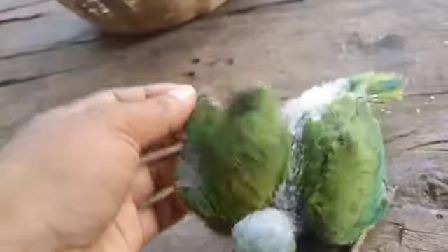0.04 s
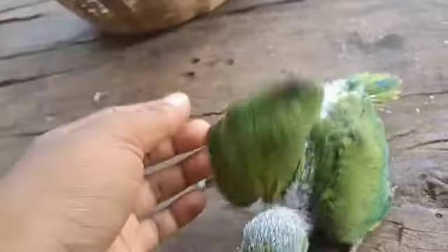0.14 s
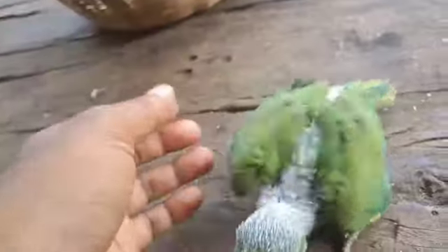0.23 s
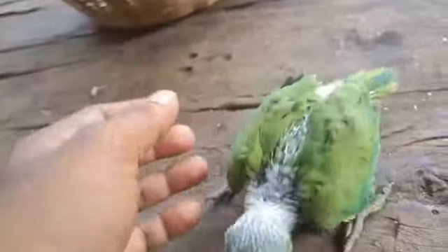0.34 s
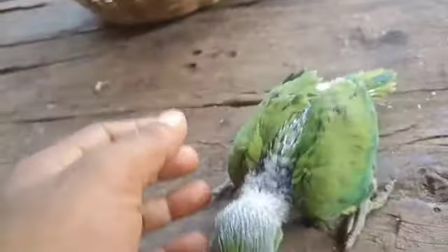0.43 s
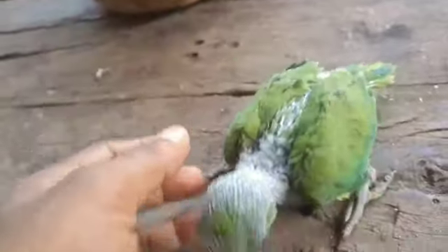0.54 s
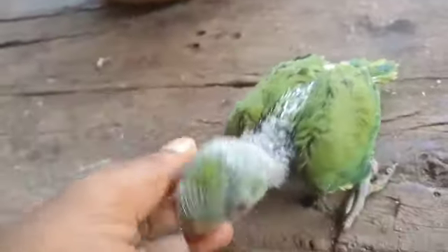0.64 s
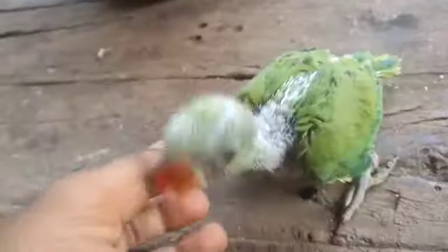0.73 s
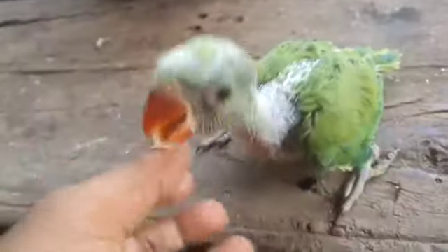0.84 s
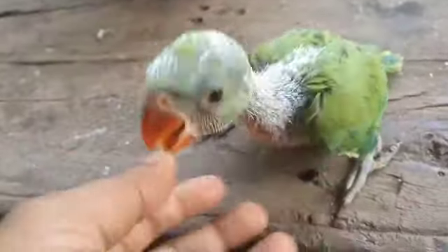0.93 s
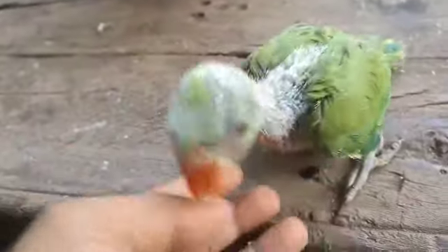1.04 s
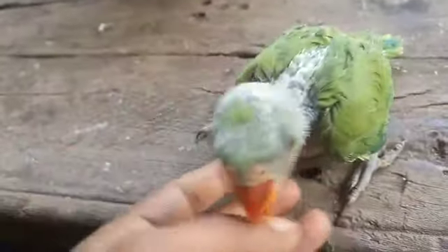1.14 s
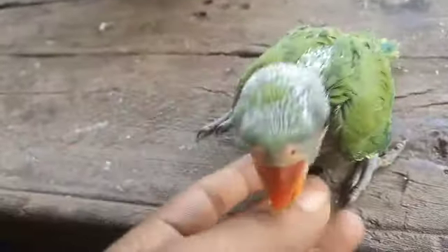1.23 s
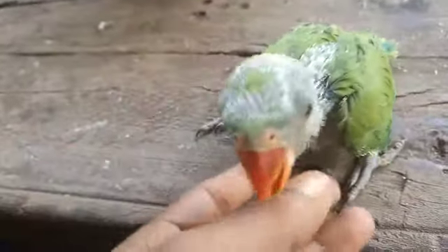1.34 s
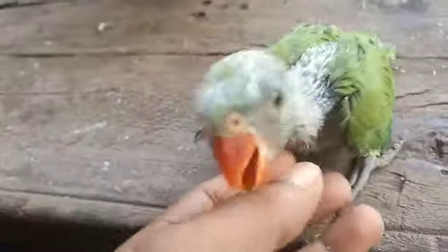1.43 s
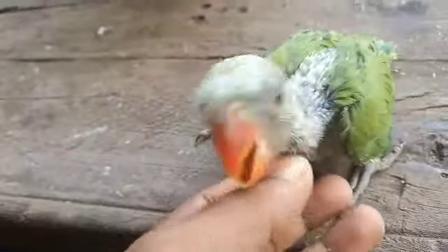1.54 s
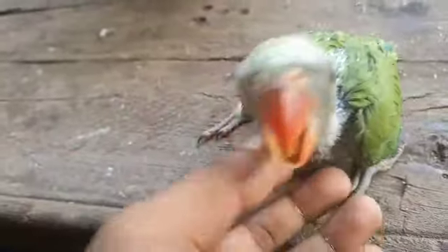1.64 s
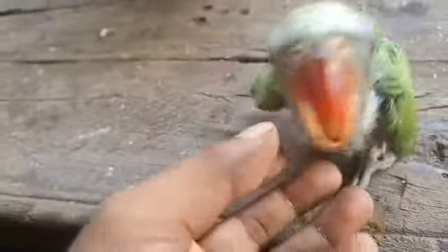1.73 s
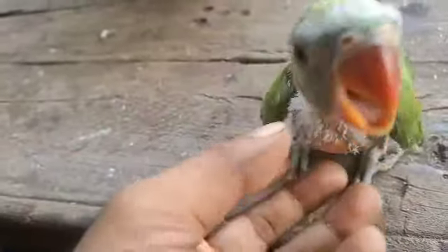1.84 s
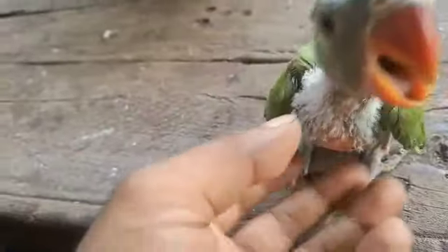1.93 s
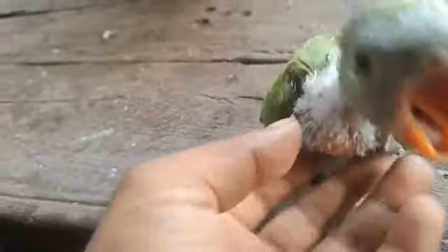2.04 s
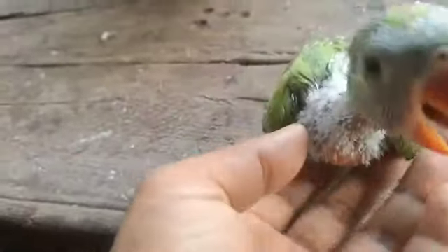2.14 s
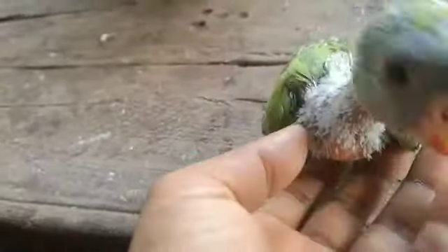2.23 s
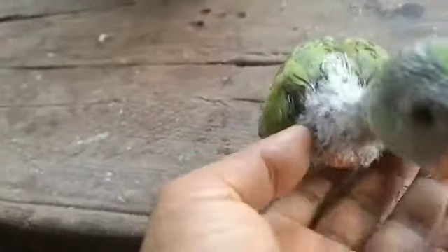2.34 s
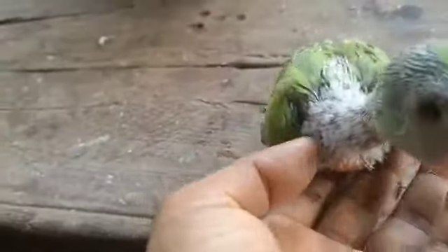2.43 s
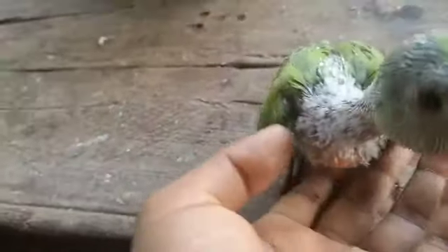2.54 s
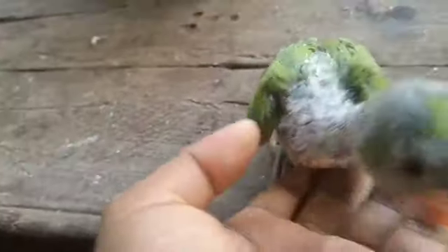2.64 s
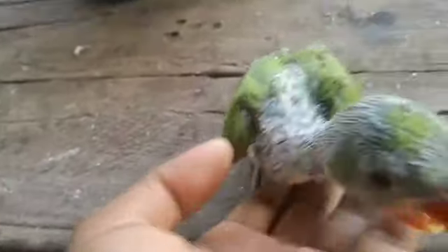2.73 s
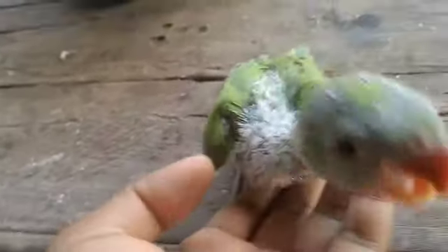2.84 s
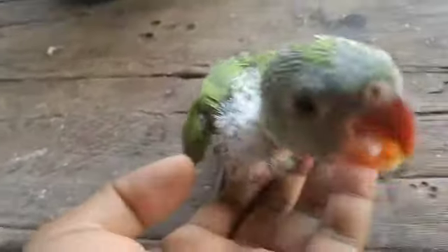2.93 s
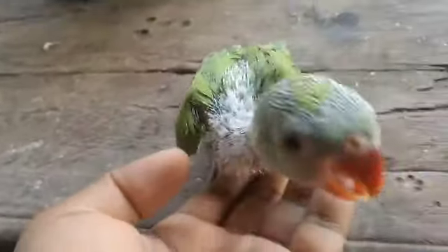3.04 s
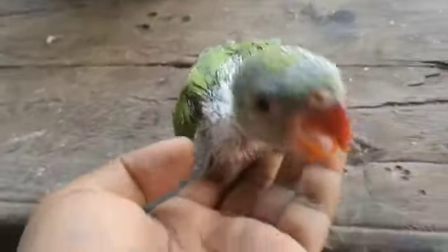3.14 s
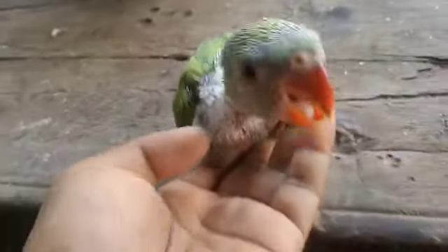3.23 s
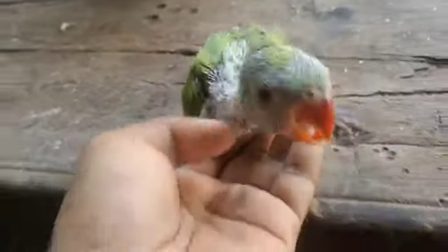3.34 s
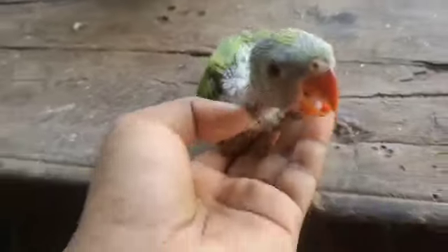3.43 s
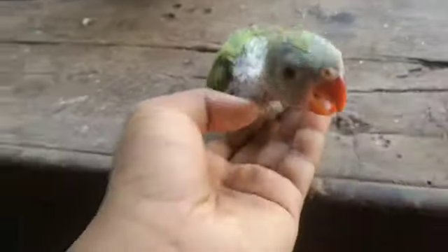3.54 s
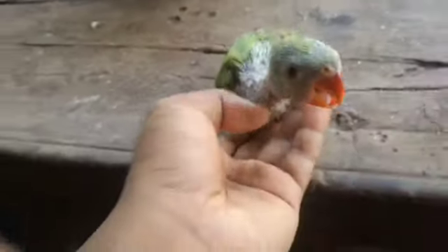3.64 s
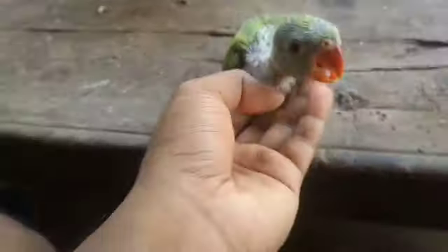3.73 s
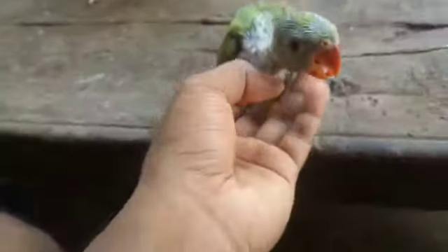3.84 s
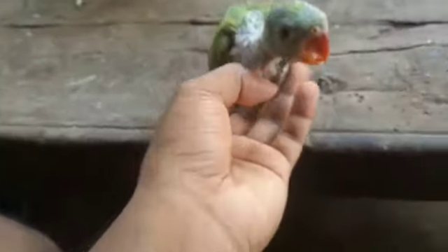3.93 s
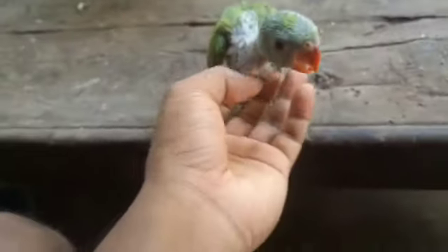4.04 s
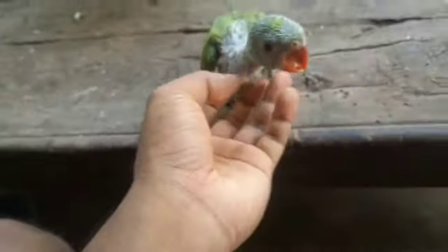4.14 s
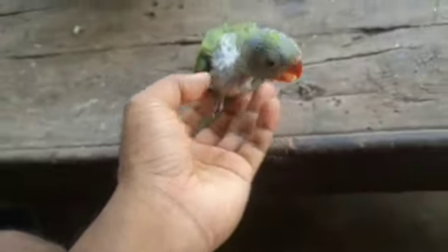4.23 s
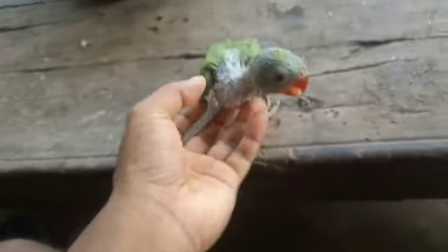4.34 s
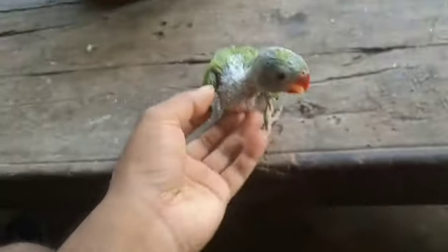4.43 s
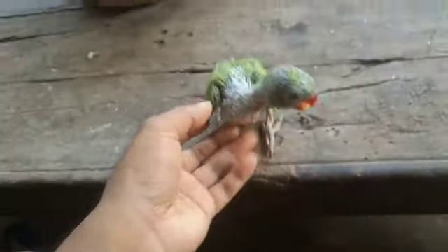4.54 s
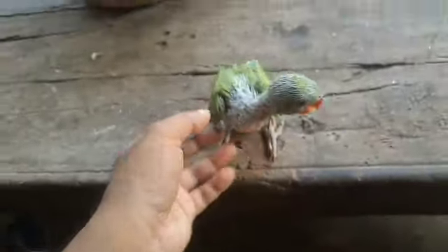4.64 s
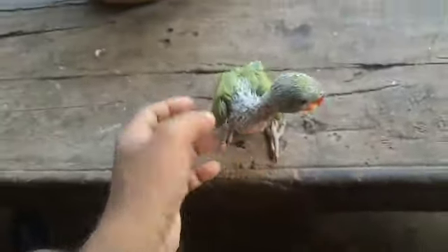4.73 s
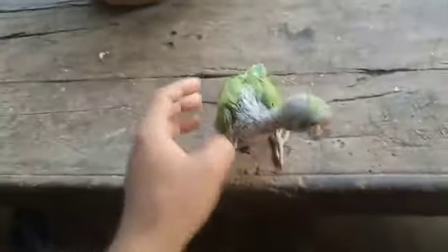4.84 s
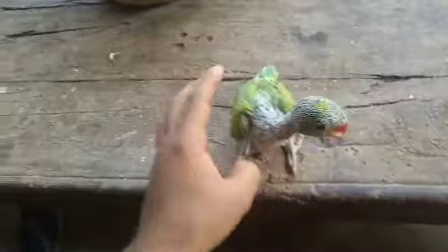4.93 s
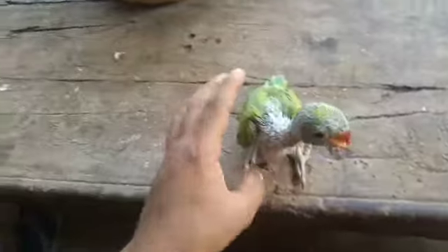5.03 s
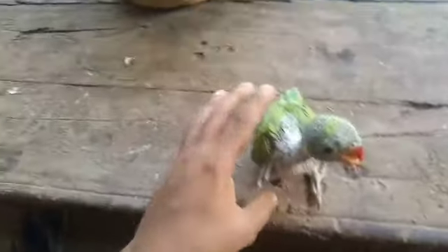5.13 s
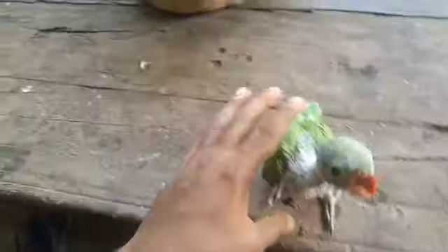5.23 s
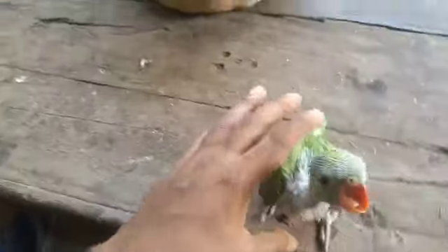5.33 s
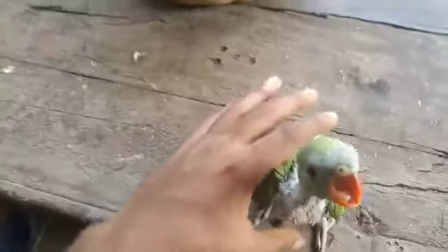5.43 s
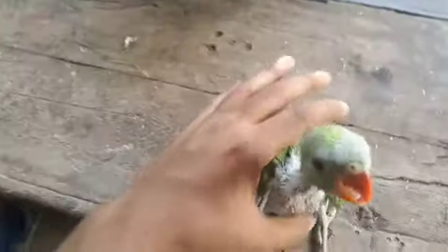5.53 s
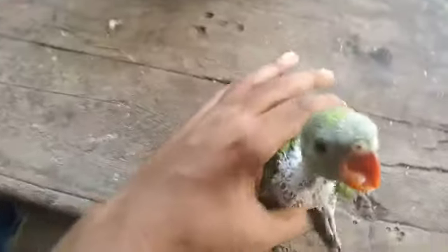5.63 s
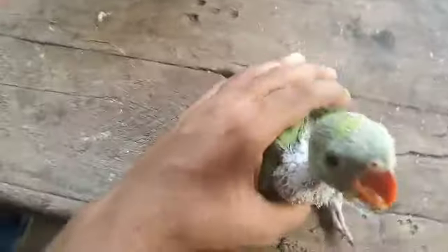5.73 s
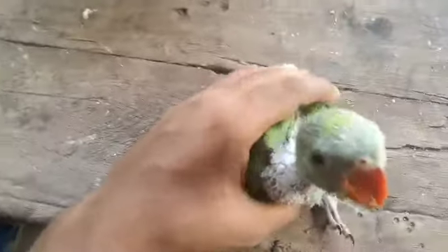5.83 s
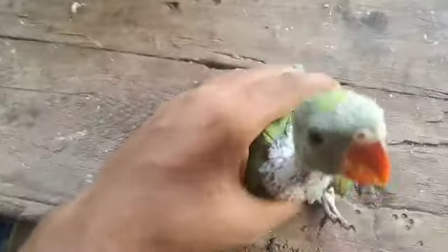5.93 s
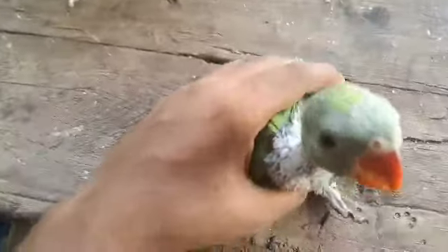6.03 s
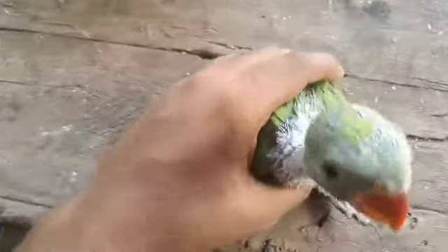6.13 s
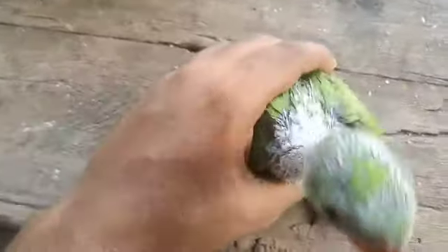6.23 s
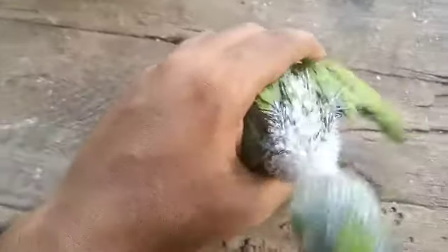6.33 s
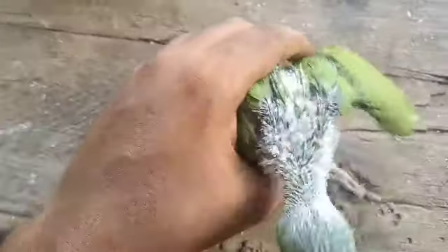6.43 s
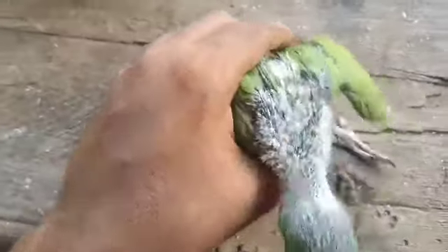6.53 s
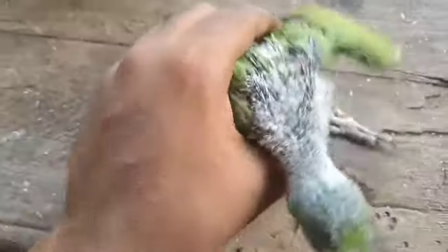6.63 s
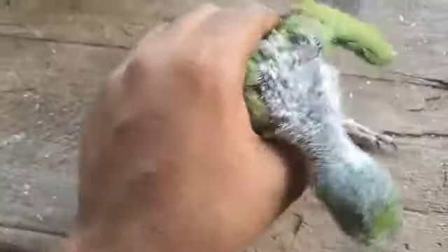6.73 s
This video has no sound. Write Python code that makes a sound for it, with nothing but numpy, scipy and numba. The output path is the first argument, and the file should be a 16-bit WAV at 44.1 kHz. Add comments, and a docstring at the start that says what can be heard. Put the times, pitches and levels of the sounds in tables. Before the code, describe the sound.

After a brief hush with two soft feathery brushes, a young parrot begins begging in a rapid, even string of short, harsh, nasal squawks, about eight per second. They quickly grow loud, weaken midway as the bird turns away, then grow again before stopping. A bright brush, a few tiny claw ticks on wood and a scrapy rustle follow. Close stereo microphone, small open room, low hum and faint insects.

```python
"""On a wooden table in an open room a parrot chick begs in a fast run of short squawks, near a two-port microphone.
Each squawk is a pulse train plus a sine at its pitch, which arches up and down; pulses are ragged at both ends
and ring in resonances of throat and beak. Head pose steers level, colour and lag per port as the head draws away.
Feathers and claws, made of gated noise, sound before and after, over resonant hum, insects and banded room hush."""
import sys
import numpy as np
from scipy import signal
from scipy.io import wavfile
from scipy.ndimage import uniform_filter1d, map_coordinates
from numba import njit

SR = 44100
rng = np.random.default_rng(int(sys.argv[2]) if len(sys.argv) > 2 else 0)


def to_wav(sig):
    """Store sig (one row per channel, or 1-D mono) as 16-bit WAV at the path in sys.argv[1].

    Samples outside -1..1 are clipped; the rate is SR.
    """
    pcm = np.clip(np.atleast_2d(sig), -1, 1) * 32767
    pcm = np.round(pcm).astype(np.int16)
    wavfile.write(sys.argv[1], SR, pcm.T)  # frames by channels


def volts_from_db(level):
    """Convert decibel levels to linear amplitude ratios."""
    exponent = np.asarray(level, float) / 20
    return 10 ** exponent


N = 298557
TIME_S = np.arange(N) / SR

# squawks: (nominal start [s], nominal length [s], top pitch [Hz], place of the top [0-1], relative level [dB])
SQUAWKS = [(0.6642, 0.076, 1304, 0.49, -39.5), (0.8, 0.06, 1245, 0.47, -32),
           (0.9222, 0.059, 1208, 0.45, -29), (1.046, 0.058, 1195, 0.44, -29),
           (1.1699, 0.059, 1235, 0.45, -29), (1.2968, 0.055, 1233, 0.43, -28.5),
           (1.4138, 0.057, 1240, 0.44, -29), (1.5364, 0.061, 1245, 0.38, -29),
           (1.661, 0.061, 1238, 0.36, -29), (1.7891, 0.059, 1215, 0.37, -28.5),
           (1.9131, 0.058, 1191, 0.39, -28), (2.043, 0.056, 1188, 0.4, -28.5),
           (2.1717, 0.055, 1178, 0.42, -28.5), (2.2959, 0.057, 1179, 0.36, -29.5),
           (2.428, 0.057, 1219, 0.4, -30), (2.555, 0.06, 1213, 0.41, -30.5),
           (2.6867, 0.057, 1209, 0.38, -31), (2.8099, 0.063, 1265, 0.39, -32),
           (2.938, 0.057, 1255, 0.39, -30), (3.063, 0.061, 1207, 0.39, -29.5),
           (3.1965, 0.062, 1225, 0.34, -30), (3.3245, 0.059, 1253, 0.37, -30.5),
           (3.451, 0.061, 1230, 0.36, -33), (3.5787, 0.06, 1260, 0.4, -33), (3.709, 0.06, 1241, 0.4, -34),
           (3.8402, 0.052, 1265, 0.42, -35.5), (3.962, 0.0578, 1256, 0.41, -37.5),
           (4.085, 0.051, 1255, 0.49, -36.5), (4.2096, 0.055, 1280, 0.49, -38),
           (4.3393, 0.062, 1283, 0.44, -40.5), (4.4749, 0.063, 1296, 0.32, -42.5),
           (4.612, 0.065, 1298, 0.35, -42), (4.7468, 0.064, 1314, 0.35, -43),
           (4.8766, 0.068, 1247, 0.44, -46), (5.025, 0.065, 1295, 0.29, -44.5),
           (5.1603, 0.063, 1249, 0.34, -42), (5.2973, 0.064, 1208, 0.39, -39),
           (5.453, 0.06, 1208, 0.38, -38), (5.5869, 0.065, 1183, 0.32, -36),
           (5.7464, 0.065, 1135, 0.4, -34.5)]
# voice roughness before end weighting: (time [s], roughness [0-1])
ROUGHNESS = [(.7, .015), (.85, .045), (1.8, .04), (3.1, .04), (4.0, .055), (4.7, .07), (5.1, .07),
             (5.7, .04)]
# main beak resonance before wobble: (time [s], centre [Hz])
BEAK_CENTRE = [(.7, 4000), (1.0, 3700), (1.4, 4020), (2.1, 3220), (2.6, 3590), (3.4, 3410), (4.2, 3800),
               (5.0, 3920), (5.3, 3570), (5.8, 3130)]
# fixed tract resonances, each run twice: (centre [Hz], width per pass [Hz], relative level [dB])
CHEST = [(900, 900, -14.0)]
THROAT = [(1566, 1430, -9), (2170, 1160, -2.5)]
UPPER_BEAK = [(4654, 460, 0.62), (5546, 720, -1.85)]
TREBLE = [(7380, 2030, -7), (9600, 2050, -9)]
SHEEN = [(10900, 430, -21), (11700, 3400, -20.5)]
# head pose: (time [s], right port lag [ms], beak swung to the left port [-1..1], facing away [0-1],
# room share [dB])
HEAD = [(.67, 0.2, -.3, 0.09, -2), (.9, 0.31, 0.42, 0.23, -4), (1.3, 0.25, .2, 0.05, -3.5),
        (1.6, 0.28, 0.66, 0.19, -5.5), (1.85, .27, 0.15, 0.08, -4.5), (2.2, .18, 0.33, 0.26, -4.5),
        (2.62, 0.085, 0.012, 0.13, -2.5), (2.87, 0.07, -0.088, 0.15, -4), (3.13, 0.24, -0.11, 0.15, -3.5),
        (3.6, 0.22, -0.4, 0.13, -3), (3.9, 0.21, 0.093, 0.87, 1), (4.15, 0.21, -0.06, 0.6, 0.5),
        (4.6, 0.18, -0.48, 0.66, 3), (4.95, .1, 0.95, 0.6, 5), (5.23, 0.038, -0.11, 0.79, 1.5),
        (5.52, 0.074, 0.11, 0, 1.5), (5.75, 0.13, 0.67, 0.43, -2.5)]
# port pickup of throat, beak, upper beak, treble, sheen: (left [dB], right [dB], left facing away [dB],
# right facing away [dB], swing slope [dB per full swing], room slope [dB/dB], lag slope [dB/ms])
PORT_PICKUP = [(5.5, 4, 8.5, 5, -5, 0.3248, 8.5), (3, 1, -3.5, 0.5, 8, 0.5, 4),
               (9, 10.5, -1, 0.5, 5, 0.6, -11), (9, 1, -23, 5.5, 3.5, 0.18, 1), (2, -22, -2, 12, 3, 1, 19)]
# echoes off table and hand: (delay [s], level [dB])
TABLE_ECHOES = [(.0012, -33.5), (.0027, -16), (.0046, -26), (.0083, -20.5), (0.0128, -17.5)]
# feathers and skin brushing past: (start [s], rise [s], peak level [dB], fade [dB/s])
BRUSHES = [(.148, 0.014, -61, 38), (.215, 0.013, -56.5, 97), (5.898, 0.15, -77, 22), (6.2, 0.016, -64, 300),
           (6.5, 0.096, -57, 61)]
# brush spectrum: (frequency [Hz], relative density [dB per Hz])
BRUSH_SPECTRUM = [(650, -47), (1100, -9), (1320, -33), (1400, -12), (1740, -3), (3140, -3), (6260, -10),
                  (6900, -11), (9270, -8), (15000, -18.5)]
# scrape resonance, run twice: (centre [Hz], width per pass [Hz], relative gain [dB])
SCRAPE = [(1780, 450, 9.5)]
# claws on wood: (time [s], peak level [dB])
CLAW_TICKS = [(6.183, -56), (6.2315, -64), (6.2935, -54)]
# room hush spectrum: (frequency [Hz], relative density [dB per Hz])
HUSH_SPECTRUM = [(15, -51), (33, -16.5), (45, -8.5), (103, -11.5), (125, -7.5), (202, -8), (286, -10.5),
                 (335, -9), (415, -16.5), (604, -16.5), (10000, -32), (15000, -48)]
# room hush: (time [s], level [dB])
HUSH_LEVEL = [(0, -61.5), (.62, -62.5), (1.0, -59), (6.1, -58.5), (6.32, -63.5), (6.77, -60.5)]
# noise correlation between ports: (frequency [Hz], likeness [-1..1])
PORT_LIKENESS = [(60, 0.67), (180, 0.95), (550, 0.74), (1650, -0.29), (4970, 0.08), (15000, 0.045)]
# noise balance between ports: (frequency [Hz], left over right [dB])
PORT_BALANCE = [(60, 2), (240, 2.5), (950, 1.5), (3770, -6.5), (15000, -2.0)]
# hum and far insects, run twice: (centre [Hz], width per pass [Hz], mean level [dB])
DRONES = [(97.9, 11.4, -67.5), (198.2, 10.7, -73.5), (5800, 810, -76.5)]


def rms_one(x):
    """Scale to rms 1."""
    return x / np.sqrt(np.mean(x ** 2) + 1e-20)


def along(rows, at):
    """Interpolate the columns of a table over its first column."""
    key, *columns = np.transpose(rows)
    return np.array([np.interp(at, key, c) for c in columns])


def at_hz(points, hz):
    """Read a spectrum on a log-frequency axis."""
    points_hz, values = np.array(points).T
    return np.interp(np.log(hz), np.log(points_hz), values)


def drift(knots_per_s):
    """Random wander: straight lines between unit-normal knots."""
    knots = rng.standard_normal(int(N / SR * 40) + 2)
    return np.interp(TIME_S * knots_per_s, np.arange(len(knots)), knots)


def resonate(x, hz, width_hz):
    """Two-pole resonance with gain 1 on top."""
    r = np.exp(-np.pi * width_hz / SR)
    b = np.array([1, 0, -1]) * (1 - r * r) / 2
    return signal.lfilter(b, [1, -2 * r * np.cos(2 * np.pi * hz / SR), r * r], x)


def ring(x, modes):
    """Parallel resonances, each applied twice for dark valleys."""
    return sum(volts_from_db(db) * resonate(resonate(x, hz, width_hz), hz, width_hz) for hz, width_hz, db in modes)


@njit
def glide(x, feedback, r):
    """Two-pole resonance with a moving centre."""
    y = np.zeros(len(x))
    for i in range(2, len(x)):
        y[i] = (1 - r * r) / 2 * (x[i] - x[i - 2]) + feedback[i] * y[i - 1] - r * r * y[i - 2]
    return y


def gliding_resonance(x, centre_hz, width_hz, passes):
    """Run the moving resonance once or more."""
    r = np.exp(-np.pi * width_hz / SR)
    feedback = 2 * r * np.cos(2 * np.pi * centre_hz / SR)
    for _ in range(passes):
        x = glide(x, feedback, r)
    return x


def banded_noise(spectrum, patchy_db):
    """Third-octave stereo noise, each band with its level, flicker, likeness and balance; mono rms 1."""
    out = 0
    edges_hz = 25 * 2 ** np.arange(0, 9.4, 1 / 3)
    white = rng.standard_normal((2, 2, N))
    for k, (low_hz, high_hz) in enumerate(zip(edges_hz, edges_hz[1:])):
        band = signal.butter(2, [low_hz, high_hz], "band", fs=SR, output="sos")
        mid, side = signal.sosfilt(band, white[k % 2])  # neighbours use separate noise
        hz = np.sqrt(low_hz * high_hz)
        alike = np.clip(at_hz(PORT_LIKENESS, hz), -1, 1)
        lean_db = at_hz(PORT_BALANCE, hz) / 2
        gain = volts_from_db(at_hz(spectrum, hz) + patchy_db * drift(10.0)) * volts_from_db(np.array([[lean_db], [-lean_db]]))
        out = out + gain * (np.sqrt(1 + alike) * mid + np.sqrt(1 - alike) * side * [[1], [-1]])
    return out / np.sqrt(np.mean(out.mean(0) ** 2))


def pitch_arch(place, top, top_hz, fall_bend):
    """Membrane pitch [Hz]: rises to a top, then sags to the same slack pitch in every squawk."""
    start_hz, end_hz, rise_bend = 600.2, 577.6, 1.3
    rise = np.sin(np.pi / 2 * np.clip(place / top, 0, 1)) ** rise_bend
    fall = np.cos(np.pi / 2 * np.clip((place - top) / (1 - top), 0, 1)).clip(0) ** fall_bend
    return np.where(place < top, start_hz + (top_hz - start_hz) * rise, end_hz + (top_hz - end_hz) * fall)


def syrinx():
    """A sine at the pitch, and one sharp puff per cycle, shaken in time and size, with air riding on it."""
    lead_s = .0012  # each squawk begins this long before its table time
    release_s = 0.0022
    crest_width = 0.11  # share of the squawk
    ragged_mid, ragged_ends, ragged_reach = .7, 6, .12  # roughness factors; reach as share of the squawk
    air_db, puffs_db = -2, 21
    fundamental, octaves, puffs = np.zeros(N), np.zeros(N), np.full(N, 1e-18)
    taps = np.arange(-8, 9)
    chance = rng.standard_normal((len(SQUAWKS), 2, 128)).clip(-2, 2)
    air = rng.standard_normal(N)
    for (start_s, length_s, top_hz, top, level_db), (shake, size) in zip(SQUAWKS, chance):
        hoarse = along(ROUGHNESS, start_s)[0]
        # a smooth voice starts slowly and holds its pitch
        attack_s, fall_bend = (.02, .7) if hoarse < .035 else (0.0027, 1.45)
        start_s, length_s = start_s - lead_s, length_s + lead_s
        place = np.linspace(0, 1, int(length_s * SR))
        first = round(start_s * SR)
        span = slice(first, first + len(place))
        pitch_hz = pitch_arch(place, top, top_hz, fall_bend)
        cycles = np.cumsum(pitch_hz) / SR
        octaves[span] = np.log2(pitch_hz / 900)

        attack = np.clip(place * length_s / attack_s, 0, 1)
        release = np.clip((1 - place) * length_s / release_s, 0, 1)
        breath = volts_from_db(level_db) * attack * release
        crest = np.exp(-((place - top) / crest_width) ** 2)
        tilt_db = (11 - 287 * hoarse) * octaves[span]  # roughness takes the fundamental's rise with pitch
        fundamental[span] = breath * volts_from_db(-3 + 10 * crest + tilt_db) * np.sin(2 * np.pi * cycles)

        count = int(cycles[-1]) + 1
        where = np.interp(np.arange(count) + .5, cycles, place)
        ends = np.exp(-where / ragged_reach) + np.exp((where - 1) / ragged_reach)
        rough = np.clip(hoarse * (ragged_mid + ragged_ends * ends), 0, .24)
        flutter_db = 30 * rough * uniform_filter1d(size, 3)[:count]
        fundamental[span] *= volts_from_db(np.interp(place, where, flutter_db))

        period = SR / np.interp(where, place, pitch_hz)  # samples
        at = (start_s + where * length_s) * SR + .3 * rough * period * shake[:count]
        # a slack membrane at the ends closes strong-weak
        uneven_db = rough * (10 * size[:count] + 14 * (-1.) ** np.arange(count))
        height = np.interp(where, place, breath) * volts_from_db(2.5 + 5 * where + uneven_db)
        spot = np.round(at)[:, None] + taps
        puff = np.sinc(spot - at[:, None]) * np.hanning(len(taps) + 2)[1:-1]  # placed between samples
        np.add.at(puffs, spot.astype(int), height[:, None] * puff)
        gate = np.exp(-5 * ((cycles + .5) % 1)) * np.interp(place, where, height * rough)
        puffs[span] += volts_from_db(air_db) * gate * air[span]
    return fundamental, octaves, volts_from_db(puffs_db) * puffs


def chick():
    """Puffs ring in the tract; the head's pose sets how each part reaches each port."""
    gape_wobble, beak_width_hz = .03, 850  # share of centre; per pass
    notch_place, notch_width_hz, notch_share = 0.76, 390, 0.45
    beak_db, beak_tilt_db_per_octave, bright_db_per_octave = 5, 3.5, 8.2
    bob_db = 1.5  # small head jerks recolour each part
    fundamental, octaves, puffs = syrinx()
    beak_hz = along(BEAK_CENTRE, TIME_S)[0] * (1 + gape_wobble * drift(8))
    # a side pocket of the tract swallows a band below the beak resonance
    puffs = puffs - notch_share * gliding_resonance(puffs, notch_place * beak_hz, notch_width_hz, 1)
    tilted = puffs * volts_from_db(beak_tilt_db_per_octave * octaves)
    beak = volts_from_db(beak_db) * gliding_resonance(tilted, beak_hz, beak_width_hz, 2)
    bright = puffs * volts_from_db(bright_db_per_octave * octaves)  # tighter membrane, brighter puffs
    parts = [ring(puffs, THROAT), beak, ring(puffs, UPPER_BEAK), ring(bright, TREBLE), ring(bright, SHEEN)]
    highpass = signal.butter(4, 520.0, "high", fs=SR, output="sos")
    low_voice = signal.sosfilt(highpass, fundamental + ring(puffs, CHEST))

    lag_ms, swung, away, room_db = along(HEAD, TIME_S)
    heard = np.array([low_voice, low_voice])
    for part, pickup in zip(parts, PORT_PICKUP):
        left_db, right_db, left_away_db, right_away_db, swung_db, far_db, lag_db = pickup
        pose_db = [left_db + (left_away_db - left_db) * away + swung_db * swung + bob_db * drift(8),
                   right_db + (right_away_db - right_db) * away - swung_db * swung + bob_db * drift(13)]
        heard += volts_from_db(np.array(pose_db) + far_db * room_db + lag_db * lag_ms) * part
    # the lagging port is softer, less so as the room share grows
    right = heard[1] * volts_from_db(.35 * room_db - 18 * lag_ms)
    return np.array([heard[0], map_coordinates(right, [np.arange(N) - lag_ms * SR / 1000], order=3)])


def room(x):
    """Six slightly dulling feedback delays a side, diffused by allpasses, plus close echoes off table and hand."""
    t60_s, reverb_db, wall_cut_hz = 0.39, -20, 36000
    right_echo_db = 7.5  # the right port hears more of table and hand
    out = np.zeros((2, N))
    dull = np.exp(-2 * np.pi * wall_cut_hz / SR)
    lags = (rng.uniform(.011, .035, 12) * SR).astype(int)
    for k, lag in enumerate(lags):
        loop, state = x.copy(), [0.]
        gain = volts_from_db(-60 * lag / SR / t60_s)
        for i in range(lag, N, lag):
            back, state = signal.lfilter([gain * (1 - dull)], [1, -dull], loop[i - lag:i], zi=state)
            loop[i:i + lag] += back[:N - i]
        out[k % 2] += volts_from_db(reverb_db) * (loop - x) * (-1) ** (k // 2)
    for lag in (41, 113, 241):
        gap = np.zeros(lag - 1)
        out = signal.lfilter(np.r_[-.6, gap, 1], np.r_[1, gap, -.6], out)
    for delay_s, db in TABLE_ECHOES:
        left = np.roll(x, round(delay_s * SR))
        right = -volts_from_db(right_echo_db) * np.roll(x, round(1.23 * delay_s * SR))
        out += volts_from_db(db) * np.array([left, right])
    return out


def rustle():
    """Soft bright brushes that swell and fade, the late ones with a scrape in them, and a few claw ticks."""
    scrape_from_s, tick_decay_s = 5.8, 0.0023
    brush = 0
    for start_s, rise_s, db, fade_db_per_s in BRUSHES:
        swell = np.clip((TIME_S - start_s) / rise_s, 0, 1) ** 2
        fade_db = fade_db_per_s * np.clip(TIME_S - start_s - rise_s, 0, None)
        brush = brush + swell * volts_from_db(db - fade_db)
    ticks = np.zeros(N)
    ticks[[round(s * SR) for s, db in CLAW_TICKS]] = volts_from_db(np.array(CLAW_TICKS)[:, 1])
    ticks = signal.lfilter([1], [1, -np.exp(-1 / (tick_decay_s * SR))], ticks)
    late_brush = brush * (TIME_S > scrape_from_s)
    scrape = late_brush * volts_from_db(2.8 * drift(38)) * ring(rng.standard_normal(N), SCRAPE)
    return (brush + ticks) * banded_noise(BRUSH_SPECTRUM, patchy_db=1.5) + scrape


def background():
    """Room hush of banded noise; wavering hum and a thin band of insects from narrow noise resonances."""
    drones = 0
    for hz, width_hz, db in DRONES:
        tone = rms_one(resonate(resonate(rng.standard_normal(N), hz, width_hz), hz, width_hz))
        drones = drones + volts_from_db(db + 1.07 * drift(15.0)) * tone
    hush = volts_from_db(along(HUSH_LEVEL, TIME_S)[0]) * banded_noise(HUSH_SPECTRUM, patchy_db=1.0)
    return hush + drones * volts_from_db(np.array([[1.5], [-1.5]]))  # drones lean left


def scene():
    """Chick, its room, rustle and background."""
    bird = chick()
    room_share_db = along(HEAD, TIME_S)[-1]
    return bird + room(bird.mean(0) * volts_from_db(room_share_db)) + rustle() + background()


def roll_off(x):
    """The treble ends steeply here."""
    return signal.sosfilt(signal.butter(12, 16490, fs=SR, output="sos"), x)


def record(dry):
    """The microphone rolls off the top."""
    rolloff = signal.butter(8, 14600.0, fs=SR, output="sos")
    mix = signal.sosfilt(rolloff, dry)
    return roll_off(mix)


dry = scene()
out = record(dry)
to_wav(out)
```